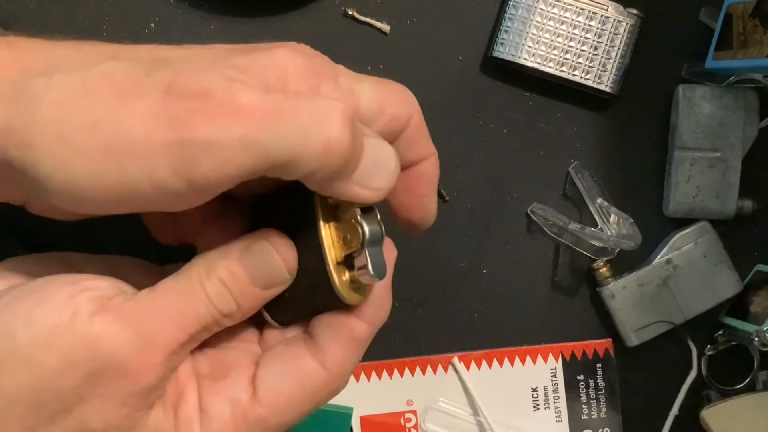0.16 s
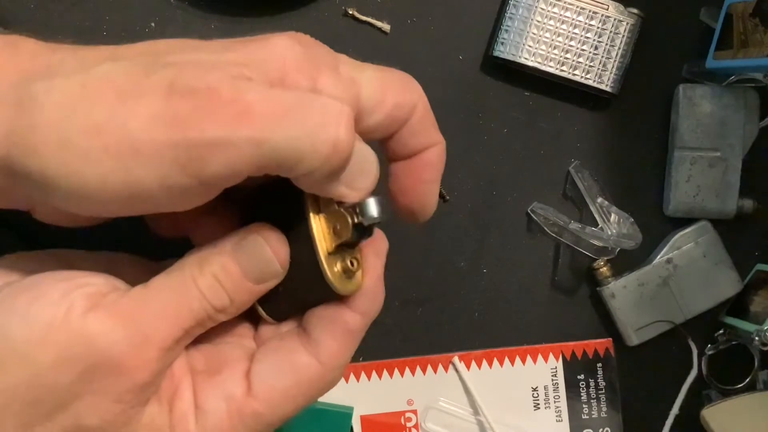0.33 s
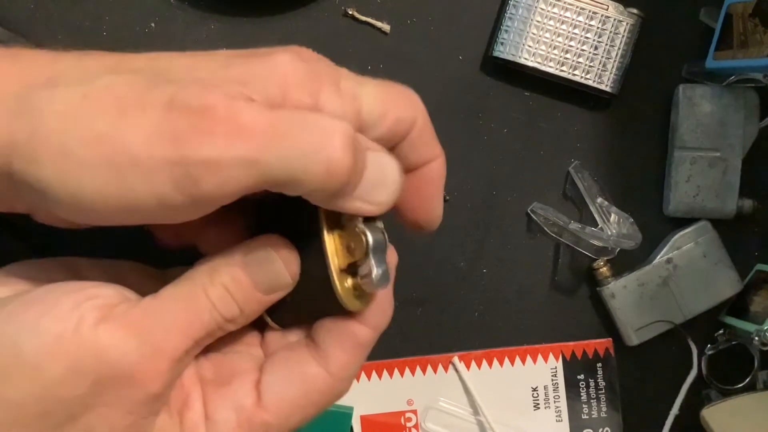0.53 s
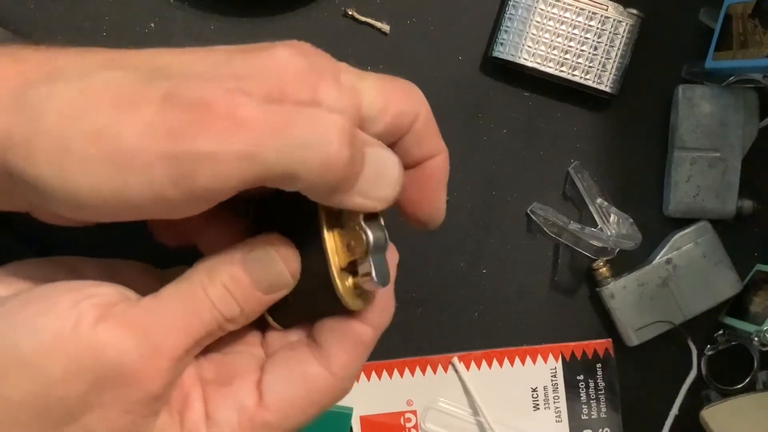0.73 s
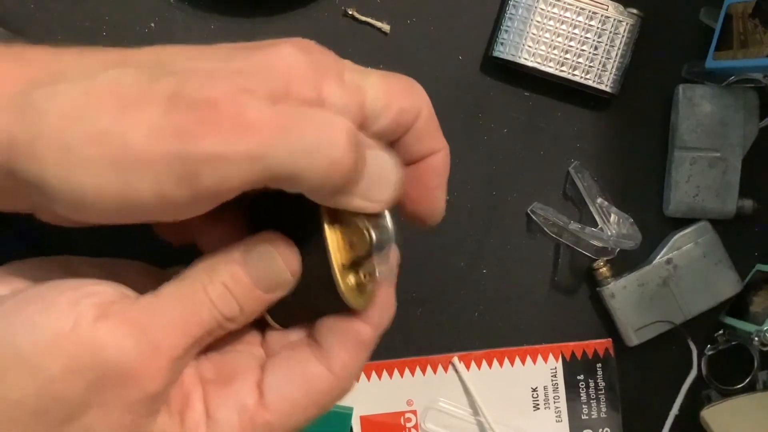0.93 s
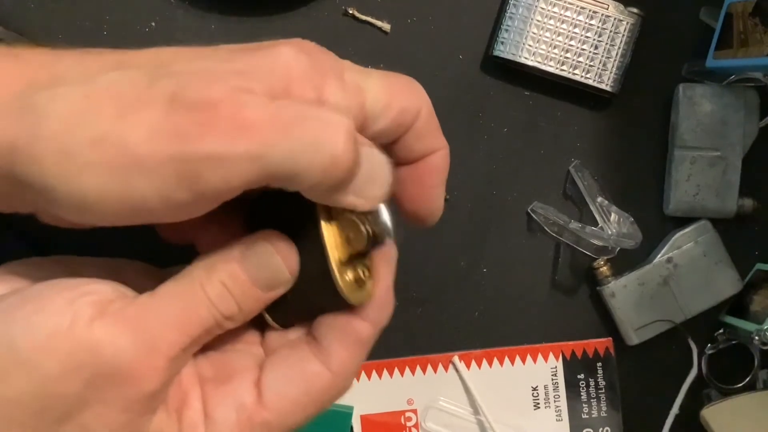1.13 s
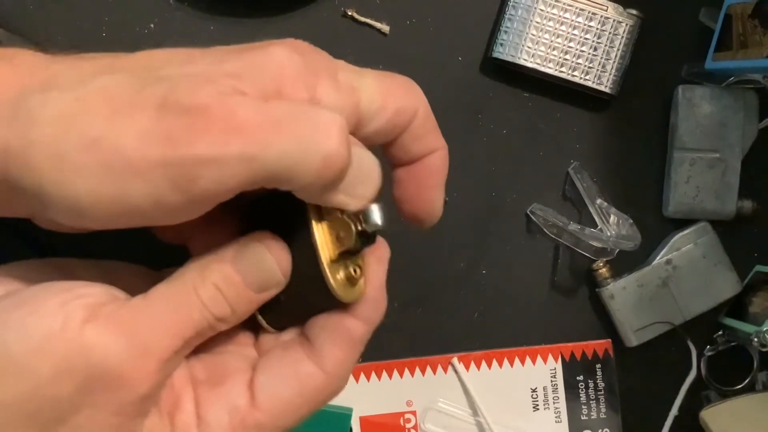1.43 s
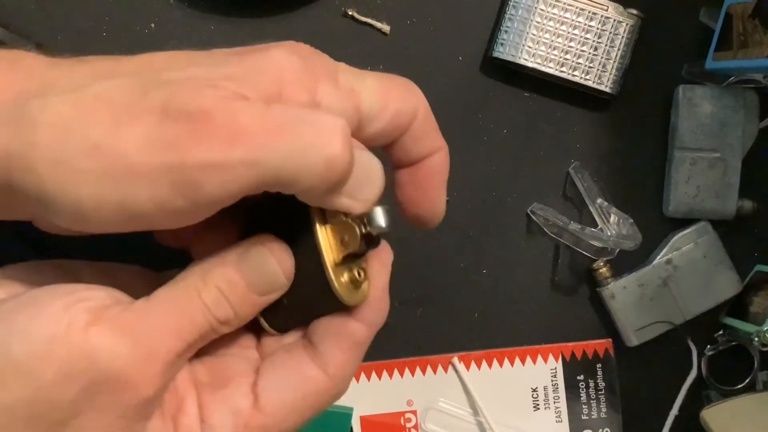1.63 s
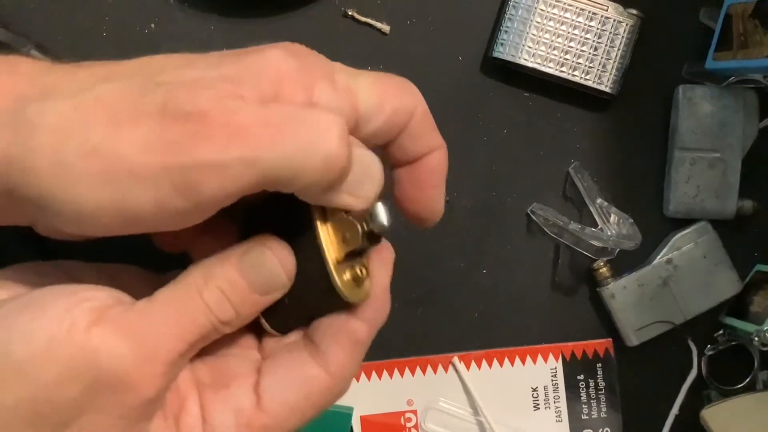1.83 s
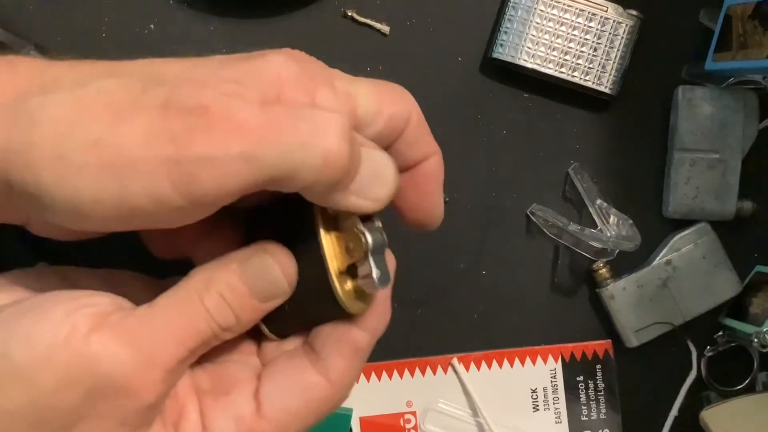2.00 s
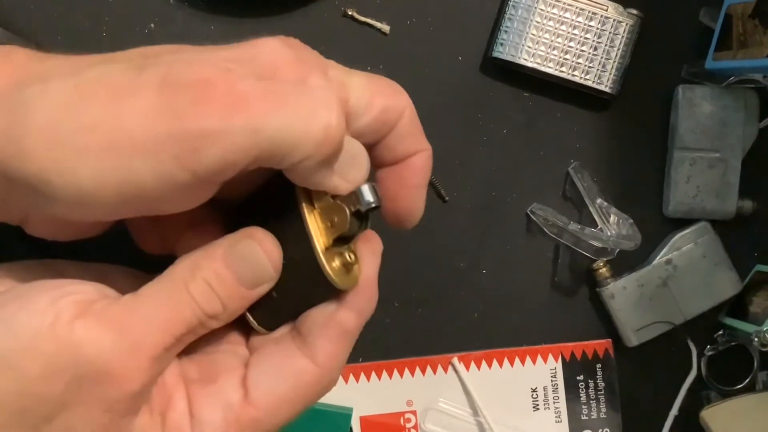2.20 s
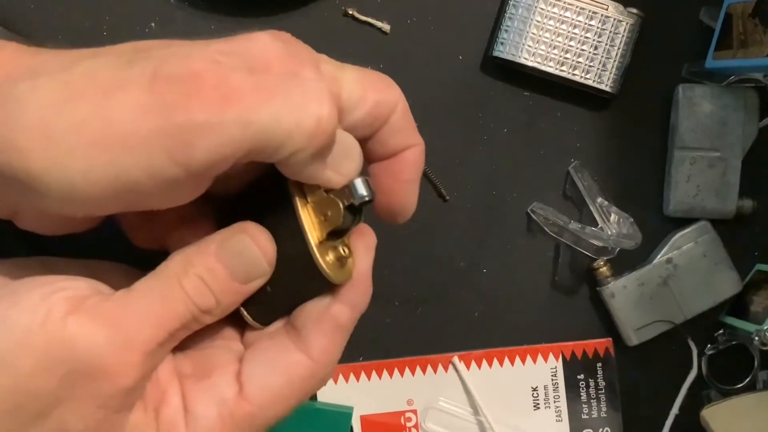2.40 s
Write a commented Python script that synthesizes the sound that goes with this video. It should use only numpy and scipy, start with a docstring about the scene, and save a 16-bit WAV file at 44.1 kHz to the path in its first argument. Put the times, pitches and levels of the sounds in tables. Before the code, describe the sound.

Sharp metallic clicks come in quick pairs as a lighter's lever snaps open and its cap clacks shut, eight times, with a faint spring ring. The microphone is close, in a small room, and soft bumps come near the end.

```python
"""A metal lighter is worked eight times by thumb, close by, over a workbench in a small room.
Each press ticks through the linkage and snaps the lever against its stop. On release the catch
clinks and the cap chatters, shuts and bounces. Snaps and landings knock the hollow case and set
a spring ringing. Under it lie a low rumble, hiss and hum; near the end come soft, muffled bumps
and the faint brush of a fingertip."""
import sys
import numpy as np
from scipy import signal
from scipy.fft import rfft, irfft, next_fast_len
from scipy.io import wavfile

SR = 44100
rng = np.random.default_rng(int(sys.argv[2]) if len(sys.argv) > 2 else 0)


def wav_out(sig):
    """Save sig, one row per channel (or a flat mono array), as 16-bit PCM at SR to the path in sys.argv[1]."""
    wavfile.write(sys.argv[1], SR, np.round(np.clip(np.atleast_2d(sig).T, -1, 1) * 32767).astype(np.int16))


N = 112454

# A colour says how strong low and high pitches are, compared with each other.
# colours of the rumble, hiss, bumps and fingertip: f/Hz, level/dB
RUMBLE_COLOUR = [(20, 2.5), (35, -3.5), (60, 3), (80, 0.5), (100, -8.5), (150, -8.5), (200, -16.5),
                 (300, -23.5), (500, -31), (1000, -45.5), (3000, -60)]
HISS_COLOUR = [(200, 3), (1000, -1), (2000, -4.5), (4000, -3), (8000, -7), (15500, -8.5), (16300, -31.5)]
MUFFLED_COLOUR = [(120, -31), (220, -3), (280, 5), (350, -7.5), (430, -3.5), (600, -11.5), (780, -13.5),
                  (1000, -25.5), (1500, -29.5), (3000, -51)]
SKIN_COLOUR = [(2500, -24.5), (4000, -8), (4600, 4.5), (5300, -9), (7000, -26.5)]
# loudness over time of the rumble, hum, lower hum and fingertip: t/s, level/dB
RUMBLE_CURVE = [(0, -45), (.6, -47), (1.1, -48.5), (2.3, -47.5), (2.55, -42.5)]
HUM_CURVE = [(0, -42.5), (.17, -52.5), (.3, -59), (.55, -52), (.8, -70.5), (2.55, -64.5)]
LOW_HUM_CURVE = [(.6, -69.5), (.74, -49), (.98, -53), (1.15, -91.5)]
BRUSH_CURVE = [(2.1, -91.5), (2.17, -72.5), (2.22, -67.5), (2.32, -76.5), (2.38, -90)]
# the peak of each muffled bump: t/s, level/dB
BUMP_PEAKS = [(1.839, -55.5), (1.917, -46.5), (1.955, -51.5), (2.007, -45.5), (2.04, -42), (2.13, -46.5),
              (2.211, -45.5), (2.251, -53), (2.323, -43), (2.406, -46), (2.529, -48.5)]

# how long the room echoes (t60 is the time to fade by 60 dB): f/Hz, t60/s
ECHO_FADE = [(300, 1.15), (1500, 0.18), (4500, 0.2255), (8000, 0.15), (15000, 0.29)]
# colour of the echo: f/Hz, level/dB
ECHO_COLOUR = [(300, -3.5), (1000, -7), (1500, 7), (2700, -5), (4500, -4.5), (7000, 3), (10000, -3),
               (14000, -9.5)]

# modes, the tones each part rings with when struck: f/Hz, level/dB, t60/s
SPRING_MODES = [(4100, -47.5, 0.28), (4240, -43, 0.3), (4580, -36.5, 0.26), (5290, -40.5, 0.2),
                (6600, -31.5, 0.11), (6930, -34.5, 0.17), (8495, -38, .15)]
LINKAGE_MODES = [(1360, -18, 0.023), (1950, -18.5, 0.035), (3000, -7.5, 0.016), (3430, -3, 0.012),
                 (4200, -2.5, 0.0058), (4550, -1, 0.008), (5370, -9, 0.0071)]
CATCH_MODES = [(1888, -9, 0.006), (3033, -4.5, 0.028), (3550, -1.5, 0.021), (4540, -2, .012),
               (5860, -6, .011), (8000, -14.5, 0.011)]
CAP_MODES = [(2680, -3.5, .016), (3120, 1, 0.017), (3350, 4, 0.015), (3620, 5, 0.019), (4650, 6, 0.008),
             (5300, 6, 0.011), (6105, 1, 0.0091), (7900, -3, 0.011), (9300, -6, .011), (12600, -6, 0.0103),
             (13700, -5, .01)]
LEVER_MODES = [(2750, -3, .013), (2980, -1.5, 0.017), (3600, -6, 0.013), (4385, -4, 0.015),
               (4660, 1, 0.023), (5820, 0.5, 0.013), (6850, -7, .012), (7850, -7, 0.012), (9950, -4, 0.011),
               (13600, -6, 0.01)]
# modes of the hollow case, knocked by the lever and by the cap: f/Hz, level/dB, t60/s
CASE_SNAP_MODES = [(415, -8, 0.022), (752, -4.5, 0.008), (1035, 0, 0.02), (1360, 4, 0.01),
                   (2006, -6, 0.022)]
CASE_LANDING_MODES = [(312.5, -3.5, 0.024), (377, -5.5, 0.038), (683, -9.5, 0.043), (1129, -7.5, 0.033),
                      (1264, -3.5, 0.025), (1916, 2, 0.03)]
# colour of the clash, the burst of noise in a light touch, a landing and a snap: f/Hz, level/dB
TOUCH_CLASH = [(150, -17.5), (800, -19.5), (2300, -23.5), (3100, -9), (5000, -1.5), (6500, -12),
               (8500, -21), (11000, -22.5), (15500, -30.5)]
LANDING_CLASH = [(150, -19), (350, -27.5), (850, -27.5), (1200, -17.5), (2300, -25), (3300, 3.5), (5200, 3),
                 (7000, -4), (9500, -9.5), (11000, -15), (13500, -10.5), (16000, -23)]
SNAP_CLASH = [(150, -33), (600, -28), (1000, -31.5), (1700, -45.5), (2800, -8.5), (4600, 6), (6300, 0),
              (8300, -8), (10000, 1), (11500, -11), (14000, -3.5), (16000, -21.5)]

# the linkage takes up its slack: t/s, level/dB
LINKAGE_TICKS = [(0.196, -48.5), (0.2156, -38), (0.4145, -42.5), (.423, -35), (0.4304, -33), (0.701, -47),
                 (.710, -37.5), (0.7179, -33), (0.733, -33), (.790, -40), (0.932, -41.5), (0.938, -36),
                 (1.1448, -37.5), (1.1536, -28.5), (1.3265, -38), (1.3341, -36), (1.508, -34),
                 (1.516, -34.5), (1.7074, -32.5), (1.7161, -34), (1.919, -34)]
# the catch clinks as the thumb lets the cap back: t/s, level/dB
CATCH_CLINKS = [(0.2328, -29.5), (0.5366, -32), (0.545, -38), (.800, -36.5), (1.0109, -30), (1.0177, -40),
                (1.022, -39), (1.229, -30), (1.391, -32.5), (1.405, -33), (1.587, -35), (1.5962, -36.5),
                (1.602, -34), (1.776, -36.5), (1.788, -30.5), (1.795, -30.5), (2.011, -29.5), (2.019, -28)]
# the cap lands: t/s, level/dB, top boost/dB, bounce delay/s, bounce gain/dB, chatter/dB, case knock/dB
CAP_LANDINGS = [(0.2456, -16.5, 1.5, 0.0039, -11.5, -26.5, -33.5),
                (0.563, -17, 2.5, 0.0017, -2.5, -29, -35.5), (0.8168, -19, -3, 0.0037, -7, -28, -36.5),
                (1.0348, -15.5, 5, 0.0035, -17.5, -24.5, -35.5),
                (1.2403, -15.5, 0.5, 0.0029, -6.5, -24.5, -36),
                (1.4168, -15, 2.5, 0.0034, -13.5, -25.5, -34.5),
                (1.6139, -17.5, 2.5, 0.0039, -6.5, -26.5, -33.5), (1.8110, -15, 0, 0.0022, -6, -24, -34),
                (2.0361, -17.5, -0.5, 0.0022, -7, -29.5, -36.5)]
# the lever snaps open: t/s, level/dB, low boost/dB, top boost/dB, pitch/ratio, case knock/dB
LEVER_SNAPS = [(0.4365, -10, 1, -5.5, 0.98, -37.5), (0.7242, -16.5, -0.5, -3, .97, -34),
               (0.9477, -13, -6, -6, 1, -37.5), (1.1601, -13, -4, -7, 1.08, -34.5),
               (1.3402, -12, 6, 4.5, 0.98, -39), (1.5212, -11.5, 1.5, -4, 0.993, -41),
               (1.722, -11.5, 1.5, 2, 0.95, -39), (1.9404, -23, -1, -3, 1.08, -38.5)]


def amp(db):
    """Turn decibels into a gain."""
    return 10 ** (np.asarray(db) / 20)


def unit(x):
    """Scale a sound to an average power of 1."""
    return x / np.sqrt(np.mean(x ** 2) + 1e-20)


def level(points):
    """Gain at every sample, from (time, dB) points."""
    return amp(np.interp(np.arange(N) / SR, *np.transpose(points)))


def along(points, hz):
    """Read between (frequency, value) points on a log frequency scale."""
    f, v = np.transpose(points)
    return np.interp(np.log(hz + 1), np.log(f + 1), v)


def boost(hz, low_db, top_db):
    """How much one blow favours the low or the top pitches, in dB."""
    return np.interp(hz, (4000, 4600), (low_db, 0)) + np.interp(hz, (8000, 13000), (0, top_db))


def noise(colour, size, low_db=0, top_db=0):
    """Noise of the given colour, with an average power of 1."""
    hz = np.fft.rfftfreq(size, 1 / SR)
    gain = amp(along(colour, hz) + boost(hz, low_db, top_db))
    return unit(irfft(gain * np.exp(2j * np.pi * rng.random(len(hz))), size))


def add(track, s, sound):
    """Mix a sound into the track at s seconds."""
    part = track[max(round(s * SR), 0):][:len(sound)]
    part += sound[:len(part)]


def ring(modes, t, low_db=0, top_db=0, scatter_db=2):
    """A struck part rings with fading tones, a little differently each time."""
    hz, db, t60 = np.transpose(modes)[:, :, None]
    db = db + boost(hz, low_db, top_db) + scatter_db * rng.standard_normal(hz.shape)
    tones = np.sin(2 * np.pi * (hz * t + rng.random(hz.shape)))
    return np.sum(amp(db - 60 * t / t60) * tones, axis=0)


def contact(modes, colour, ring_db, clash_db, t60, attack_s=0.0008, low_db=0, top_db=0):
    """Metal meets metal: a short ring and a noisy clash."""
    t = np.arange(SR // 16) / SR
    rise = 1 - np.exp(-(t / attack_s) ** 2)
    fade = amp(-60 * np.maximum(t - 0.0004, 0) / t60)  # holds for 0.4 ms first
    clash = unit(rise * noise(colour, len(t), low_db, top_db) * fade)
    ringing = unit(rise * ring(modes, t, low_db, top_db))
    sound = amp(ring_db) * ringing + amp(clash_db) * clash
    return unit(sound) * np.sqrt(.002 / t[-1])  # as much energy as 2 ms at power 1


def background(hum_hz=120, low_hum_hz=81):
    """Room rumble, thin hiss and two hums that swell and fade."""
    def tone(hz):
        return np.sqrt(2) * np.sin(2 * np.pi * (hz * np.arange(N) / SR + rng.random()))
    hums = level(HUM_CURVE) * tone(hum_hz) + level(LOW_HUM_CURVE) * tone(low_hum_hz)
    rumble = level(RUMBLE_CURVE) * noise(RUMBLE_COLOUR, N)
    hiss = amp(-68.5) * noise(HISS_COLOUR, N)
    return rumble + hiss + hums


def in_room(sound, echo_db=-11.5, delay_s=0.0022, build_s=0.0014):
    """A sound plus the small room's echo, which gathers it from all sides and so blurs its tones."""
    hz, t, spectrum = signal.stft(rng.standard_normal(SR // 3), SR, nperseg=256)
    fade = amp(-60 * t / along(ECHO_FADE, hz)[:, None])
    tail = signal.istft(spectrum * fade, SR, nperseg=256)[1]
    size = len(tail)
    tail *= np.clip((np.arange(size) / SR - delay_s) / build_s, 0, 1)
    # the echo takes on the sound's colour, averaged over 9% either side of each frequency
    total = np.cumsum(np.abs(rfft(sound, size)) ** 2)
    bins = np.arange(len(total))
    reach = .09 * bins + 1
    power = (np.interp(bins + reach, bins, total) - np.interp(bins - reach, bins, total)) / (2 * reach)
    colour = np.sqrt(np.abs(power)) * amp(echo_db + along(ECHO_COLOUR, bins * SR / size))
    out = irfft(rfft(tail / np.linalg.norm(tail)) * colour, size)
    add(out, 0, sound)
    return out


def bumps(rise_s=0.018, t60=.22):
    """Soft, low bumps swell and die away."""
    t, power = np.arange(N) / SR, np.zeros(N)
    for s, db in BUMP_PEAKS:
        swell = np.exp(-(np.minimum(t - s, 0) / rise_s) ** 2)
        fade = amp(db - 60 * np.maximum(t - s, 0) / t60)
        power += (swell * fade) ** 2
    return np.sqrt(power) * noise(MUFFLED_COLOUR, N)


def fingertip():
    """Skin slides faintly over the lever at the end."""
    return level(BRUSH_CURVE) * noise(SKIN_COLOUR, N)


def spring():
    """The spring rings on faintly after every snap and landing."""
    out, t = np.zeros(N), np.arange(SR // 2) / SR
    for s, db, *_ in LEVER_SNAPS + CAP_LANDINGS:
        add(out, s, amp(db) * ring(SPRING_MODES, t))
    return out


def case(rise_s=0.00084):
    """Every snap and landing knocks the hollow case, which the hand deadens."""
    out, t = np.zeros(N), np.arange(SR // 16) / SR
    rise = 1 - np.exp(-(t / rise_s) ** 2)
    for events, modes in ((LEVER_SNAPS, CASE_SNAP_MODES), (CAP_LANDINGS, CASE_LANDING_MODES)):
        for s, *_, knock_db in events:
            add(out, s - rise_s, amp(knock_db) * in_room(ring(modes, t) * rise))
    return out


def linkage():
    """The small linked parts tick as they take up their slack."""
    out = np.zeros(N)
    for s, db in LINKAGE_TICKS:
        tick = contact(LINKAGE_MODES, TOUCH_CLASH, ring_db=-1, clash_db=-2, t60=.015)
        add(out, s, amp(db) * in_room(tick))
    return out


def catch():
    """The catch clinks as the thumb lets the cap back."""
    out = np.zeros(N)
    for s, db in CATCH_CLINKS:
        clink = contact(CATCH_MODES, TOUCH_CLASH, ring_db=-2.5, clash_db=-3, t60=.014)
        add(out, s, amp(db) * in_room(clink))
    return out


def cap(chatter_gap_s=.0029, jitter_s=.0005):
    """The cap chatters over the catch in three quick touches, lands and bounces once."""
    out = np.zeros(N)
    for s, db, top_db, bounce_s, bounce_db, chatter_db, _ in CAP_LANDINGS:
        for k, (late, extra_db) in enumerate(rng.standard_normal((3, 2)), start=1):
            clink = contact(CATCH_MODES, TOUCH_CLASH, ring_db=-9.5, clash_db=-3, t60=.014)
            when = s - k * chatter_gap_s + late * jitter_s
            add(out, when, amp(chatter_db + extra_db) * in_room(clink))
        for when, hit_db in ((s, db), (s + bounce_s, db + bounce_db)):
            hit = contact(CAP_MODES, LANDING_CLASH, ring_db=-3.5, clash_db=2, t60=0.017,
                          attack_s=0.0003, top_db=top_db)
            add(out, when, amp(hit_db) * in_room(hit))
    return out


def lever():
    """Each press snaps the lever against its stop; the grip shifts its pitch a little."""
    out = np.zeros(N)
    for s, db, low_db, top_db, pitch, _ in LEVER_SNAPS:
        modes = np.multiply(LEVER_MODES, (pitch, 1, 1))
        snap = contact(modes, SNAP_CLASH, ring_db=-2.5, clash_db=-1, t60=0.014,
                       attack_s=0.0003, low_db=low_db, top_db=top_db)
        add(out, s, amp(db) * in_room(snap))
    return out


def scene():
    """Mix the room and the lighter into one channel."""
    mix = background() + bumps() + lever() + cap() + case() + spring() + linkage() + catch()
    return (mix + fingertip())[None]


def record(dry, top_hz=16100):
    """Cut away the very highest treble."""
    size = next_fast_len(N + SR // 2)
    kept = np.fft.rfftfreq(size, 1 / SR) < top_hz
    return irfft(rfft(dry, size) * kept, size)[..., :N]


dry = scene()
out = record(dry)
wav_out(out)
```